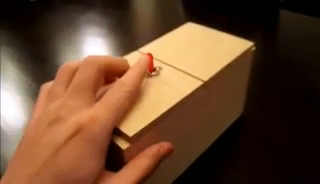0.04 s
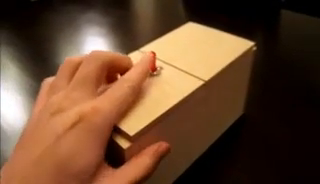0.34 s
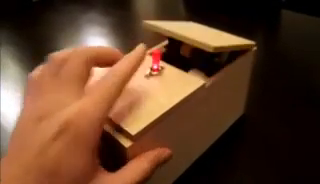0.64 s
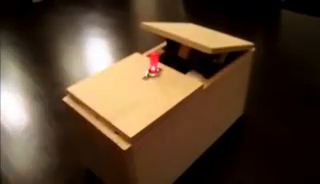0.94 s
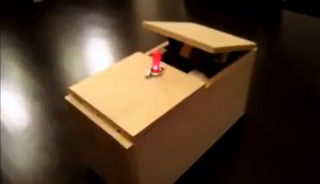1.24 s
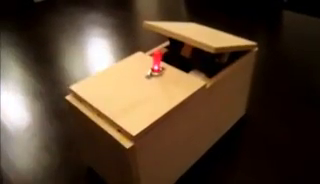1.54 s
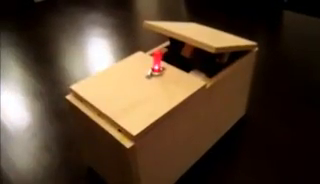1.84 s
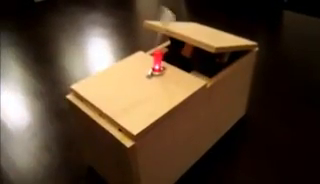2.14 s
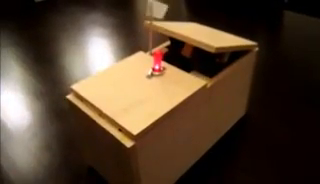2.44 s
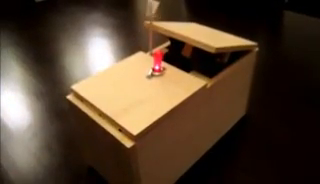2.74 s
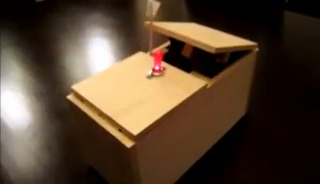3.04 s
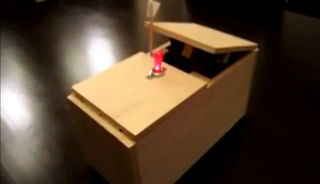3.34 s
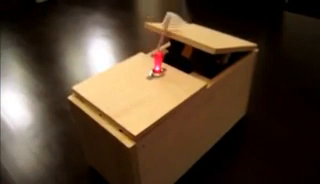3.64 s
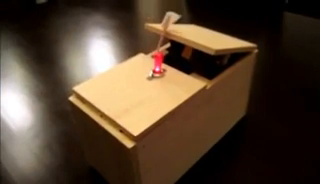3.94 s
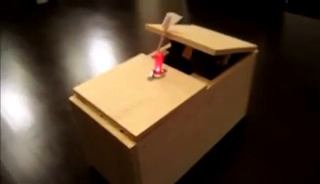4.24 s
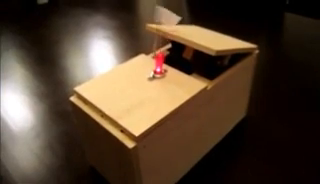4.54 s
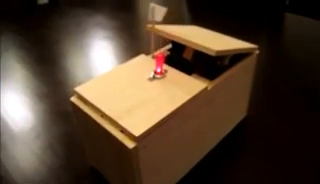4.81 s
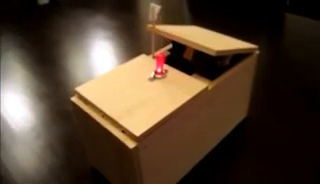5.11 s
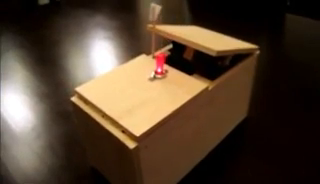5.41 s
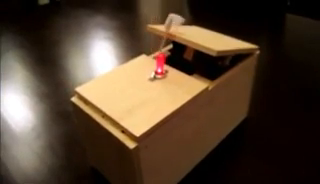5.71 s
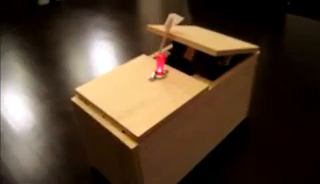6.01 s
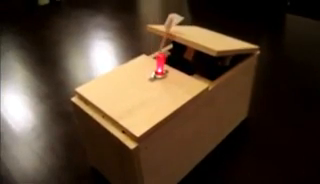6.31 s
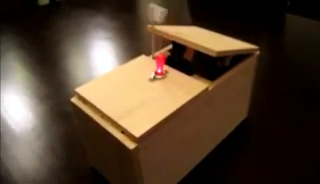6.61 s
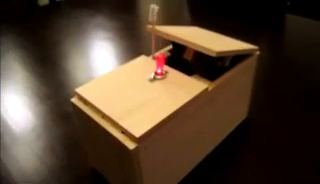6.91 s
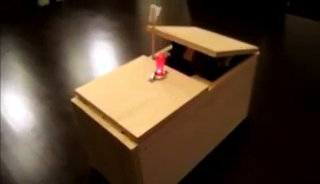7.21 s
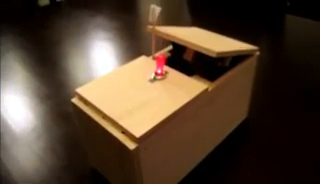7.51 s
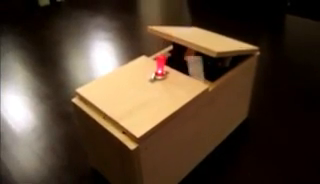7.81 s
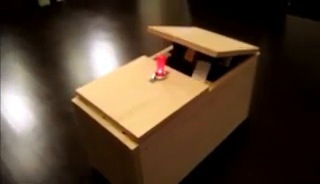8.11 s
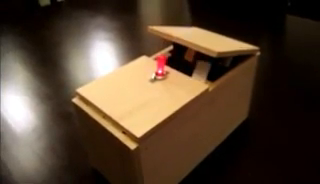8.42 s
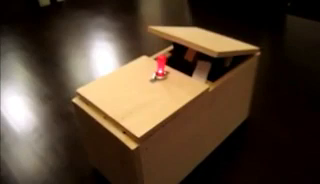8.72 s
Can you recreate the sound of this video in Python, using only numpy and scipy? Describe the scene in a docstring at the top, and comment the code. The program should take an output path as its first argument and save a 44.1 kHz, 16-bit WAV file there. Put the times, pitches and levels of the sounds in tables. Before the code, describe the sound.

A toggle switch snaps and a wooden lid knocks open, then a small servo makes short raspy whirs, each ending in a sharp clack.

```python
"""Useless box in a quiet room

A finger snaps the toggle switch of a wooden box on a table, and a servo knocks the lid open.
A second geared servo swings the arm out, dips and lifts it twice and pulls it back in.
Each move is a rasp of gear teeth that ends in a clack of backlash; the room rings on."""
import sys
import numpy as np
from scipy import signal
from scipy.fft import rfft, irfft, next_fast_len
from scipy.io import wavfile
from scipy.ndimage import map_coordinates

SR = 44100
rng = np.random.default_rng(int(sys.argv[2]) if len(sys.argv) > 2 else 0)


def wav_record(signal):
    """Record a signal, one row per channel, as 16-bit PCM in the file named by sys.argv[1]."""
    frames = np.transpose(np.atleast_2d(signal))
    bounded = np.clip(frames, -1, 1)
    # unit amplitude maps onto the largest positive 16-bit level
    quanta = np.round(bounded * 32767).astype(np.int16)
    wavfile.write(sys.argv[1], SR, quanta)


N = 390726
TOP_HZ = 8080

# servo runs: start_s, stop_s, level_db, stop_clack_db (over the run), stroke
SERVO_MOVES = [(0.579, 0.7, -34.5, -3, "lid"), (2.088, 2.291, -26.3, 15.5, "out"),
               (3.588, 3.666, -27.5, 5.5, "dip"), (4.605, 4.686, -27.5, 7, "lift"),
               (5.603, 5.683, -26.5, 6, "dip"), (6.621, 6.701, -26.5, 5.5, "lift"),
               (7.620, 7.824, -26, 4, "in")]
# resonances of the servo case and arm, mounted in the box: centre_hz, width_hz, gain_db
CASE_MODES = [(558, 50, -7), (833, 91, -12), (1080, 38, -3), (1543, 125, 1), (2284, 85, -6.5),
              (2600, 130, 2.5), (3300, 200, -11), (4250, 410, 1.5), (5470, 350, 0.5), (6230, 270, 0.5),
              (6770, 260, -1.5), (7560, 330, -3.5)]
# resonances of the loose arm: centre_hz, width_hz, gain_db (per filter pass)
ARM_MODES = [(2608, 137, 1), (3100, 260, 0), (3420, 370, -7)]
# whine of the fast gears: centre_hz, width_hz, gain_db (per filter pass)
WHINE_MODES = [(2628, 58, 0), (4193, 120, -2), (5450, 320, 1), (6210, 70, -4), (6680, 55, -8)]


def servos(motor_hz=446, spin_up_s=.035, slow_down_s=.025, engage_s=.0045, brake_s=.0073,
           settle_s=.085, jerk_s=.039):
    """The motor spins up, drives the gears, slows near its goal, brakes and trembles briefly."""
    # how each stroke loads the servo: tilt_db_per_octave, rattle_db, whine_db, jerk_db, hum_db
    stroke_tones = {"lid": (-5, 1, -6, -5, -24), "out": (-0.5, -10, -3.5, -10, -22.5),
                    "dip": (-1, -7, -9, -14.5, -36), "lift": (-1, -6, -4.5, -10.5, -27.5),
                    "in": (0.65, -10, -7, -15.5, -23.5)}
    # the panel that carries the servo: centre_hz, width_hz, gain_db
    mount_modes = [(545, 114, 0)]
    out, t = np.zeros(N), np.arange(SR // 2) / SR
    engage = (1 - np.exp(-t / engage_s)) ** 2
    for start, stop, db, _, stroke in SERVO_MOVES:
        tilt_db, rattle_db, whine_db, jerk_db, hum_db = stroke_tones[stroke]
        ahead, after = np.maximum(stop - start - t, 0), np.maximum(t - (stop - start), 0)
        speed = (1 - .5 * np.exp(-t / spin_up_s)) * (1 - .25 * np.exp(-ahead / slow_down_s))
        turns = np.cumsum(motor_hz * speed * (1 + .012 * wobble(60, len(t)))) / SR
        drive = engage * np.exp(-after / brake_s)
        tremble = amp(-13) * (after > 0) * np.exp(-(after / settle_s) ** 4)
        binding = amp(2 * wobble(150, len(t)))  # the plastic gears bind and free themselves unevenly
        teeth = gear_teeth(turns, per_turn=4, scatter_db=5, friction_db=-4.5)
        rasp = unit(through_case(teeth, tilt_db))
        slow_teeth = gear_teeth(turns, per_turn=.99, scatter_db=6.5, friction_db=-1.5)
        rattle = amp(rattle_db) * resonant(slow_teeth, ARM_MODES)
        whine = amp(whine_db) * resonant(rng.standard_normal(len(t)), WHINE_MODES)
        gears = (drive + tremble) * binding * (rasp + rattle + whine)
        hum = amp(hum_db) * drive * speed ** 2 * unit(np.sin(2 * np.pi * turns))
        # starting and braking jerk the mounting panel
        jerks = engage * np.exp(-t / jerk_s) + amp(-2) * (after > 0) * np.exp(-after / jerk_s)
        panel = amp(jerk_db) * jerks * resonant(rng.standard_normal(len(t)), mount_modes)
        add(out, start, amp(db) * (gears + hum + panel))
    return out


def gear_teeth(turns, per_turn, scatter_db, friction_db):
    """One uneven click for each tooth that meshes, over the hiss of sliding flanks."""
    meshes = np.diff(np.floor(turns * per_turn), prepend=0) > 0
    sizes = amp(scatter_db * rng.uniform(-1, 1, len(turns))) * rng.choice([-1, 1], len(turns))
    return unit(meshes * sizes) + amp(friction_db) * rng.standard_normal(len(turns))


def through_case(x, tilt_db, pivot_hz=4000):
    """Tooth contacts, direct and through the ringing case; more tilt per octave sounds harder."""
    # spectrum of a tooth click: frequency_hz, gain_db
    click_spectrum = [(60, -36.5), (300, -29.5), (600, -12), (1200, -12.5), (2000, -2), (3500, 0.5),
                      (5000, 0.5), (8000, -5)]

    def response(hz):
        tilt = amp(tilt_db * np.log2(np.clip(hz, pivot_hz / 4, TOP_HZ) / pivot_hz))
        return (amp(along(click_spectrum, hz)) + resonances(CASE_MODES, hz)) * tilt * (hz < TOP_HZ)
    return filtered(x, response)


def backlash(take_up_s=.0125, chatter_s=.0105, ticks_per_s=14):
    """Every run hits its stop; arm strokes also take up their play, tick, catch and rebound twice."""
    # gear play per arm stroke: take_up_arm_db, catch_s (before the stop; a negative value falls after it),
    # catch_db (over the run), # catch_tilt_db_per_octave, catch_arm_db, rebound_s (after the stop), rebound_db
    # (over the run)
    gear_play = {"out": (-13, .003, 14, 2.5, -10, .046, 6.5), "dip": (0.5, .018, 10, -3, 0.5, .058, -2.5),
                 "lift": (-12, -0.01, 9.5, 1, -13, .040, 4), "in": (2.5, .004, 10.5, -2, -6, .043, -4)}
    contacts = []  # start_s, level_db, tilt_db_per_octave, arm_ring_db
    for start, stop, db, stop_db, stroke in SERVO_MOVES:
        contacts.append((stop, db + stop_db, -1.5, 1.5))  # the stop shakes the arm hard
        if stroke not in gear_play:
            continue
        take_up_arm_db, catch_s, catch_db, tilt, catch_arm_db, rebound_s, rebound_db = gear_play[stroke]
        contacts += [(start + take_up_s, db + 4.5, -.5, take_up_arm_db),
                     (stop - catch_s, db + catch_db, tilt, catch_arm_db),
                     (stop + rebound_s, db + rebound_db, -2.2, -12),
                     (stop + rebound_s + chatter_s, db + rebound_db - 1.5, -2.2, -12)]
        stray_ticks = start + take_up_s + (np.arange(8) + rng.uniform(size=8)) / ticks_per_s
        contacts += [(s, db + .5, 2.4, -12.5) for s in stray_ticks if s < stop]
    return contacts


def gear_clacks(t60_s=.038, attack_s=.0017):
    """The play in the gears closes with a quick cluster of contacts that shakes the arm."""
    out, t = np.zeros(N), np.arange(SR // 8) / SR
    cluster = amp(-60 * t / t60_s) * (1 - np.exp(-t / attack_s))
    for s, db, tilt_db, arm_db in backlash():
        gears = through_case(cluster * rng.standard_normal(len(t)), tilt_db)
        arm = amp(arm_db) * cluster * resonant(rng.standard_normal(len(t)), ARM_MODES)
        add(out, s, amp(db) * (gears + arm))
    return out


def box_knocks(low_cut_hz=125):
    """Each blow rings the wooden panels, booms in the cavity and makes the loose lid chatter."""
    # blows on the box: start_s, level_db, contact_cutoff_hz, boom_db, chatter_db, chatter_t60_s,
    # panel_hz, panel_db, panel_t60_s
    blows = [(0.5583, -14.5, 4500, -7, -5, 0.05, 408, 3, 0.036),
             (0.6088, -6, 2580, -13, -5, 0.054, 1000, 5, 0.0088),
             (0.6976, -12.5, 2310, -2.5, -1.5, 0.1, 1150, -3.5, 0.017),
             (0.7064, -18.5, 2000, 4.5, -18, 0.1, 554, -10, 0.028),
             (2.2935, -31, 2000, -22, -12, .04, 552, -1.5, 0.092),
             (7.8252, -27, 2500, -20, -19, 0.027, 1517, 7, .025)]
    # box panels: pitch_hz, level_db, t60_s
    wood_modes = [(369, -16.5, 0.072), (524, -15, 0.076), (824, -13, 0.046), (1046, -12.5, .04),
                  (1440, -25, 0.016), (1880, -8.5, .015), (2250, -7, 0.018), (2693, -7, 0.035),
                  (3190, -10, 0.036)]
    # air inside the box and the table under it: pitch_hz, level_db, t60_s
    cavity_modes = [(153, -6.5, 0.18), (181.4, -11, 0.18), (243, -19.5, 0.18)]
    out, t = np.zeros(N), np.arange(SR // 3) / SR
    for s, db, contact_hz, boom_db, chatter_db, chatter_t60, *struck_panel in blows:
        chatter = amp(chatter_db - 60 * t / chatter_t60) * rng.normal(0, 2, len(t))
        contact = signal.butter(2, contact_hz, fs=SR, output="sos")
        wood = signal.sosfilt(contact, ring(wood_modes, t) + chatter)
        boom = amp(boom_db) * ring(cavity_modes, t)
        add(out, s, amp(db) * (wood + ring([struck_panel], t) + boom))
    # a small box radiates little deep bass
    return signal.sosfilt(signal.butter(2, low_cut_hz, "highpass", fs=SR, output="sos"), out)


def switch_snaps(crack_db=-5, crack_t60_s=.028, creep_db=-24, creep_s=.0018, lead_s=.008):
    """Small stiff parts creep for an instant, then snap over: a crack and one short high ring."""
    # snaps of the switch and the lid linkage: start_s, level_db, ring_hz, t60_s
    snaps = [(.5543, -8, 3930, 0.015), (.6163, -21, 3310, 0.035), (0.6177, -17, 5160, 0.046),
             (0.6221, -20, 3270, 0.023), (.666, -20, 3875, 0.059), (.671, -20, 3600, 0.042)]
    out, t = np.zeros(N), np.arange(SR // 8) / SR
    before = np.arange(-round(lead_s * SR), 0) / SR
    for s, db, hz, t60 in snaps:
        creep = amp(creep_db) * np.exp(before / creep_s) * rng.standard_normal(len(before))
        crack = amp(crack_db - 60 * t / crack_t60_s) * rng.standard_normal(len(t))
        add(out, s - lead_s, amp(db) * np.concatenate([creep, ring([(hz, 0, t60)], t) + crack]))
    return out


def table_bumps():
    """Faint dull bumps as the box rocks and the hand comes to rest."""
    # bumps through the table: peak_s, level_db, centre_hz, width_hz, half_length_s
    bumps = [(0.732, -41, 42, 30, 0.048), (.712, -35, 105, 45, 0.016), (1.216, -48, 107, 35, 0.032)]
    out, t = np.zeros(N), np.arange(N) / SR
    for s, db, hz, width, half_length in bumps:
        swell = amp(db) * np.exp(-((t - s) / half_length) ** 2)
        out += swell * resonant(rng.standard_normal(N), [(hz, width, 0)])
    return out


def room_reverb(x, predelay_s=.007, evenness=.61):
    """Diffuse answer of the walls; each frequency dies at its own speed."""
    # decay of the room: frequency_hz, t60_s
    decay_times = [(120, 0.57), (500, 0.6), (1500, 0.8), (3500, 0.61), (8000, 0.47)]
    hz, t, noise = signal.stft(rng.standard_normal(SR), SR, nperseg=256)
    tail = signal.istft(noise * amp(-60 * t / along(decay_times, hz)[:, None]), SR, nperseg=256)[1]
    tail = np.pad(tail / np.linalg.norm(tail), (round(predelay_s * SR), 0))
    # the walls hear every side of the box, so the peaks that beam from the open lid stand out less
    beamed = ARM_MODES + WHINE_MODES + [CASE_MODES[3]]
    all_sides = filtered(x, lambda f: 1 / (1 + evenness * np.abs(resonances(beamed, f)) ** 2))
    return signal.fftconvolve(all_sides, tail)[:N]


def room_tone(level_db=-50.5):
    """Steady rumble and hiss of the quiet room."""
    # spectrum of the room tone: frequency_hz, relative_db
    spectrum = [(12, -32), (20, -3.5), (128, -1.5), (168, -2), (239, -3), (340, -6.5), (459, -9), (590, -9),
                (652, -10.5), (721, -11), (817, -12), (1160, -14.5), (1350, -15.5), (1570, -17.5),
                (8000, -26.5), (10400, -65), (17600, -120)]
    return amp(level_db) * unit(filtered(rng.standard_normal(N), lambda hz: amp(along(spectrum, hz))))


def amp(db):
    """Decibels to gain."""
    return 10 ** (np.asarray(db) / 20)


def unit(x):
    """Scale to rms 1."""
    return x / np.sqrt(np.mean(x ** 2) + 1e-20)


def along(points, hz):
    """Interpolate (frequency_hz, value) points on a log frequency axis."""
    f, v = np.transpose(points)
    return np.interp(np.log(hz + 1), np.log(f + 1), v)


def filtered(x, response):
    """Filter x by a complex function of frequency."""
    size = next_fast_len(len(x) + 8192)
    return irfft(rfft(x, size) * response(np.fft.rfftfreq(size, 1 / SR)), size)[:len(x)]


def resonances(modes, hz):
    """Causal response of (centre_hz, width_hz, gain_db) resonances."""
    return sum(amp(db) * 1j * hz * w / (c * c - hz * hz + 1j * hz * w) for c, w, db in modes)


def resonant(x, modes):
    """Two filter passes through the modes leave only their ringing, at rms 1."""
    return unit(filtered(x, lambda hz: resonances(modes, hz) ** 2))


def ring(modes, t):
    """Damped sines; neighbouring modes swing in opposite directions."""
    return sum((-1) ** k * amp(db - 60 * t / t60) * np.sin(2 * np.pi * hz * t)
               for k, (hz, db, t60) in enumerate(modes))


def wobble(rate, size):
    """A smooth random curve, rate knots a second."""
    knots = rng.standard_normal(int(size * rate / SR) + 4)
    return map_coordinates(knots, [np.arange(size) * rate / SR])


def add(track, s, sound):
    """Mix a sound into the track at s seconds."""
    start = round(s * SR)
    track[start:start + len(sound)] += sound[:N - start]


def scene():
    """The box close by, with the room around it, in mono."""
    gears = amp(-1) * servos() + amp(.5) * gear_clacks()
    box = box_knocks() + switch_snaps()
    reverb = amp(-6.5) * room_reverb(gears) + amp(-9) * room_reverb(box)
    return (gears + box + reverb + table_bumps() + room_tone())[None]


def record(dry, ceiling=.85):
    """Round off the highest peaks and cut the treble steeply at TOP_HZ."""
    rounded = dry / (1 + (dry / ceiling) ** 4) ** .25
    high_cut = lambda hz: np.clip((TOP_HZ - hz) / 100 + .5, 0, 1)
    return np.array([filtered(channel, high_cut) for channel in rounded])


dry = scene()
out = record(dry)
wav_record(out)
```